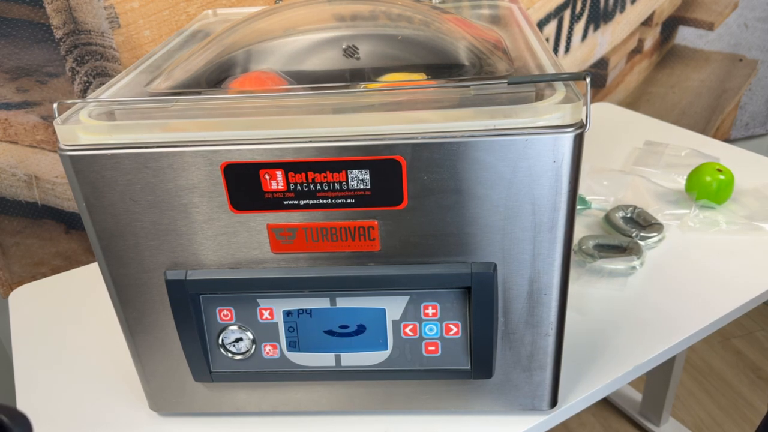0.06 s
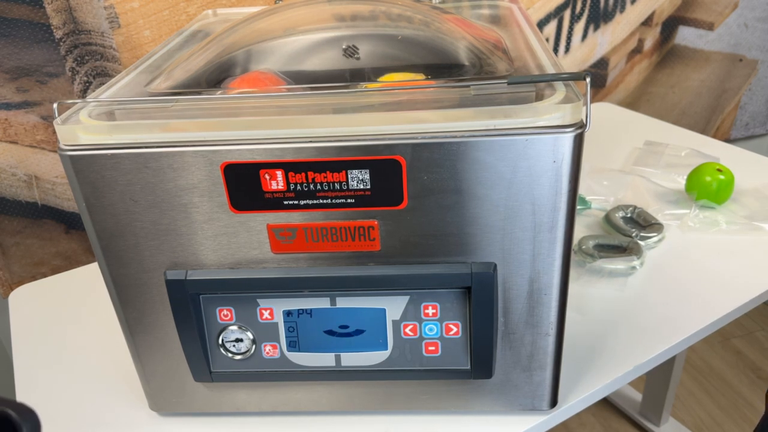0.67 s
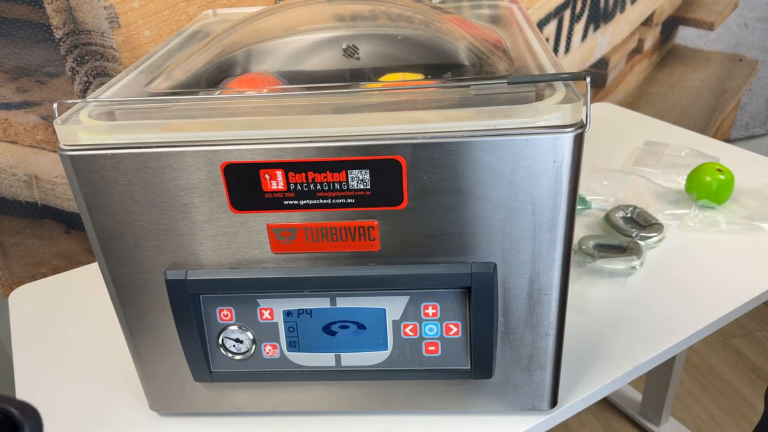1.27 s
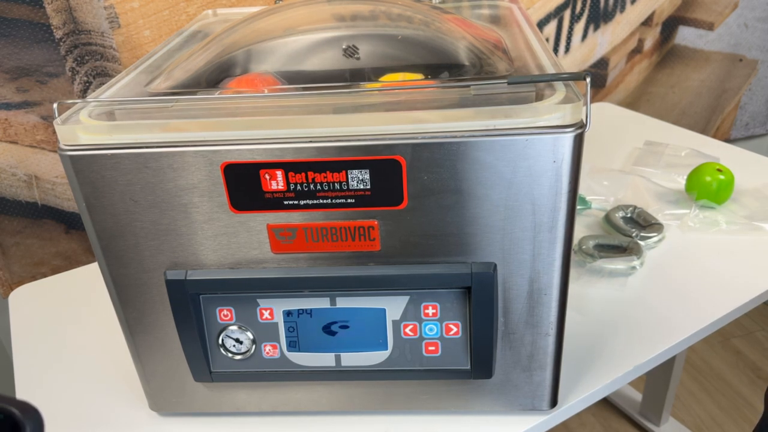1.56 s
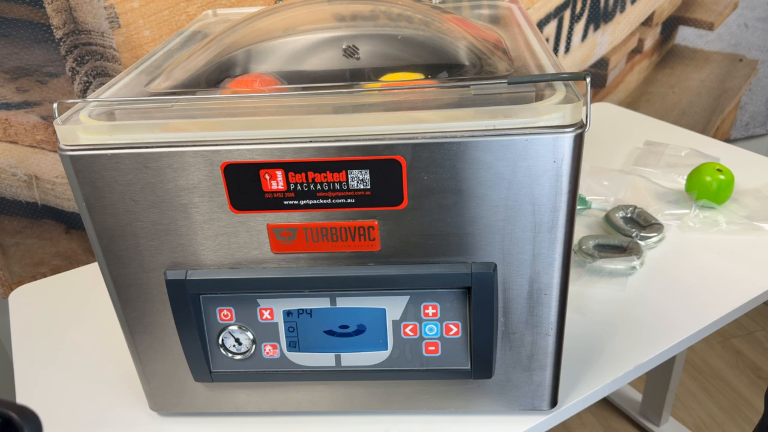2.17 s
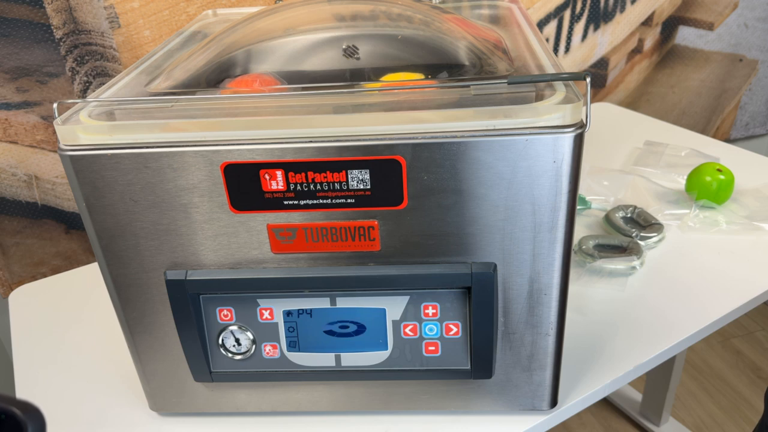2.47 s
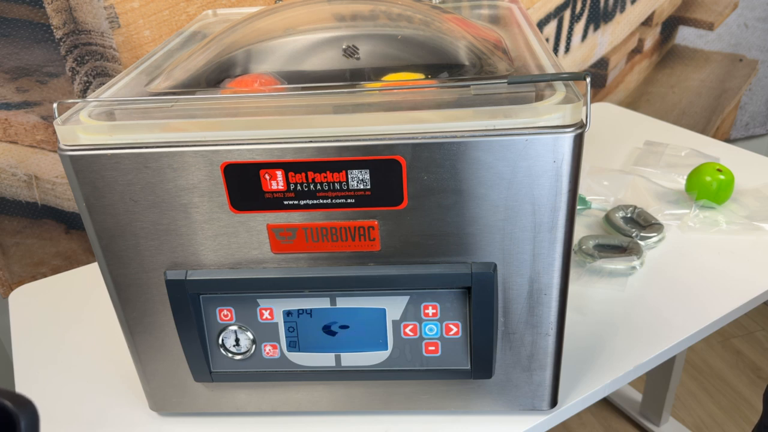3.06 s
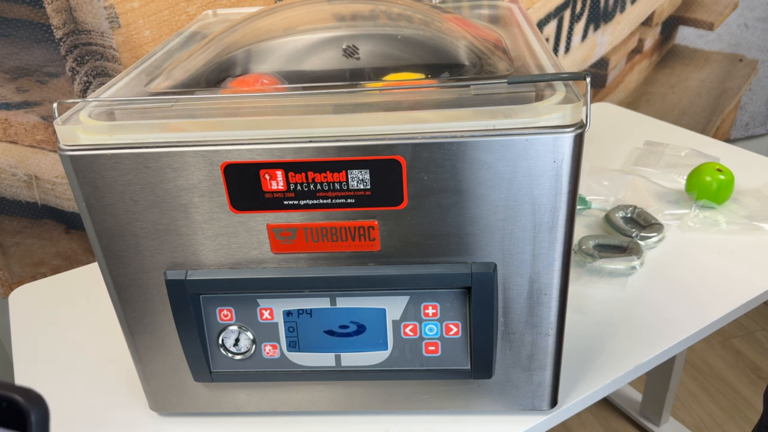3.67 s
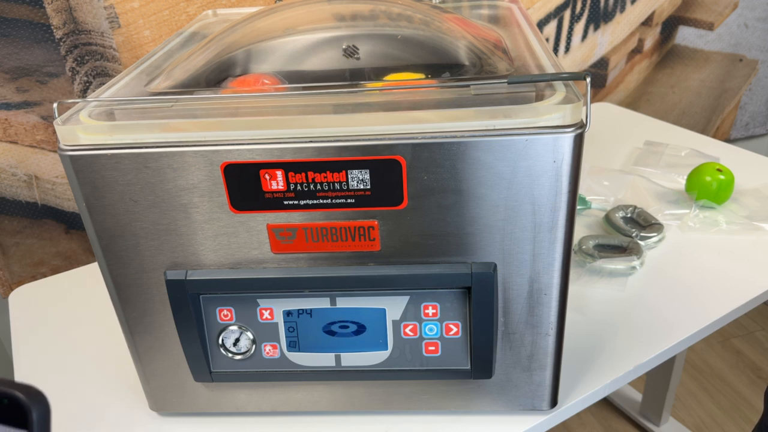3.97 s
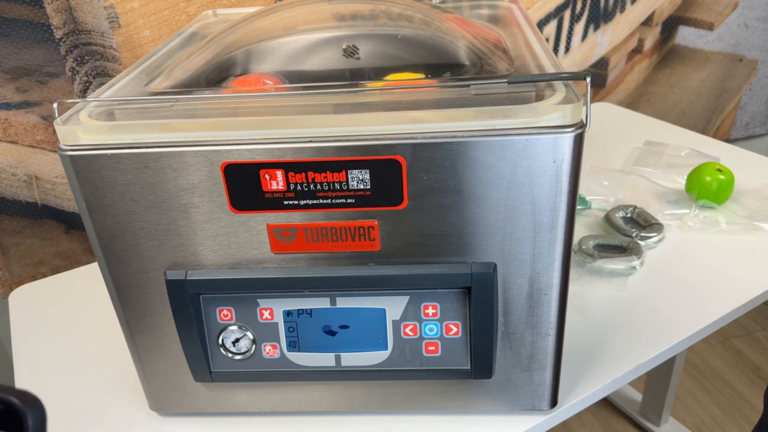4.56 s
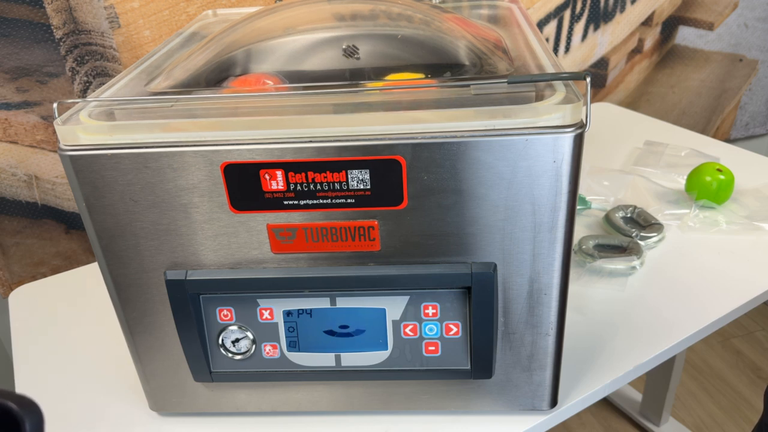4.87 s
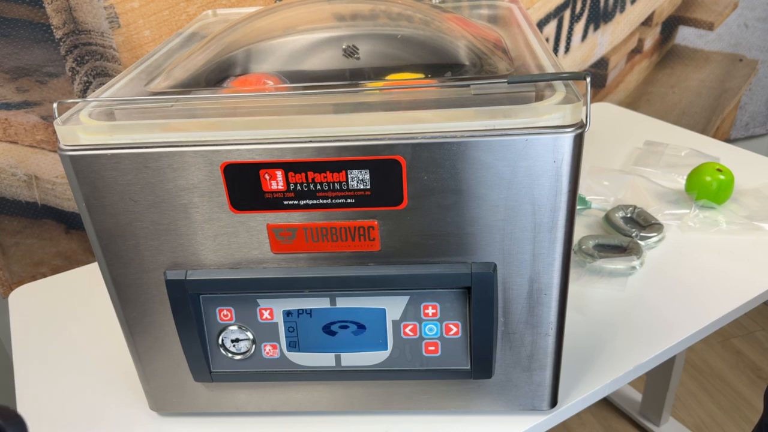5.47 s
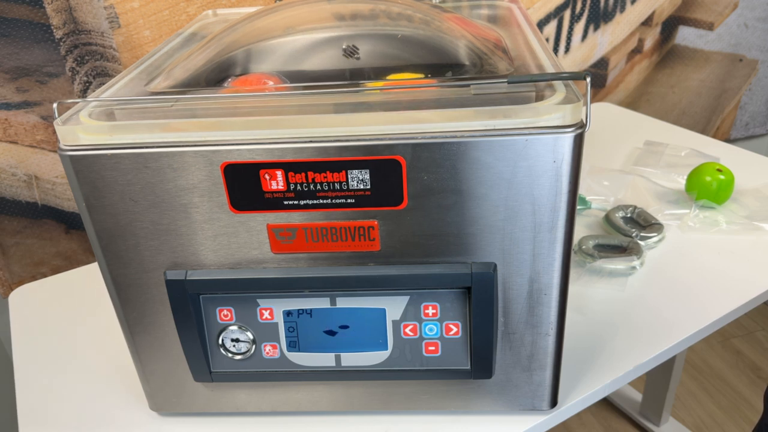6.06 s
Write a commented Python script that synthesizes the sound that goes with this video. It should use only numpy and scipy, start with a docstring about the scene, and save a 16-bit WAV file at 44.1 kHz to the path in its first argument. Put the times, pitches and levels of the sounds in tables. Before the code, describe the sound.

In a quiet workshop, a vacuum sealer gives a few tiny ticks, then its valve opens with a metallic clack and an instant of squeal. Air at once rushes into the steel chamber with a bright, steady, slightly hollow hiss. From about halfway the hiss gradually dulls and softens but keeps going. A faint electrical hum lies underneath, and the machine sounds close.

```python
"""Air jets into the evacuated chamber of a vacuum sealer, and its turbulence excites the resonances
of the hollow steel machine. The hiss is steady while the inlet is choked, then dulls as the flow eases.
It begins with the clack of a solenoid valve, a brief squeal and a faint whistle. Beneath it lies
a quiet workshop: room air, mains hum, a far motor, a few small ticks and one soft bump."""
import sys
import numpy as np
from scipy import signal
from scipy.fft import rfft, irfft
from scipy.io import wavfile

SR = 44100
rng = np.random.default_rng(int(sys.argv[2]) if len(sys.argv) > 2 else 0)


def persist_wave(psi):
    """Save psi, clipped to +-1, as 16-bit WAV."""
    counts = np.round(np.clip(psi, -1, 1) * 32767).astype(np.int16)
    wavfile.write(sys.argv[1], SR, np.atleast_2d(counts).T)


N = 279197
TIME = np.arange(N) / SR
HZ = np.fft.rfftfreq(N, 1 / SR)
OPEN_S = .3925  # the valve opens

# Noise spectrum of the workshop air: (frequency [Hz], relative density [dB])
AIR_SPECTRUM = [(15, -2), (45, 1), (75, -2.5), (160, 0.5), (240, -7), (320, 2), (450, -10), (700, -15),
                (1200, -23), (3500, -27), (4700, -24), (8000, -33.5), (15000, -40)]
# Accelerations of the motor: (midpoint [s], half length [s], pitch rise [Hz], level swell [dB])
MOTOR_REVS = [(3.2, 0.4, 6.5, 8.5), (6.3, .3, 11, 8)]
# Ticks in the machine before it vents: (time [s], level [dB], centre [Hz], width [octaves])
TICKS = [(0.086, -66, 1200, .8), (0.092, -67, 2900, 0.45), (.0985, -79, 2020, .7), (.119, -68, 5300, 0.38),
         (.139, -74, 5500, .35), (.181, -71, 4500, .8)]
# Impacts of the plunger rattling against its stop: (time [s], relative level [dB])
PLUNGER_IMPACTS = [(0.3922, -31), (.396, -33), (0.4016, -35.5), (0.4119, -37), (.4283, -42)]
# Modes of the valve and its housing: (frequency [Hz], relative level [dB], t60 [s])
VALVE_MODES = [(107.4, -3.5, 0.11), (305, -13, 0.11), (346, -3, 0.11), (464, -1, 0.11), (730, -9, 0.31),
               (860, -14, .15), (1065, -14.5, 0.22), (1470, -5, 0.15), (1700, -14, 0.11), (1770, -15, 0.17),
               (3200, -16, .09), (3440, -14, .08), (4010, -13, .1), (4520, 0, 0.16)]
# Dense rattle of the sheet steel: (frequency [Hz], relative density [dB])
PANEL_SPECTRUM = [(60, -22), (110, 5), (200, -11), (370, 9.5), (650, -8), (1700, 2), (2300, -13.5),
                  (3500, 5), (5000, -2.5), (7000, -37), (15000, -30)]
# Turbulence at the inlet: (frequency [Hz], relative density [dB])
JET_SPECTRUM = [(60, -38), (260, -26), (600, -21.5), (1900, -16.9), (2400, -10.5), (3200, -11),
                (4500, -0.75), (6200, 0), (7600, -5.5), (8800, -7.5), (9800, -12.5), (11300, -8.5),
                (13300, -20), (15600, -20)]
# Resonances of the air line, chamber and cabinet: (frequency [Hz], width [Hz], lift [dB])
CAVITY_MODES = [(344, 21, 11.0), (458, 53, 12.3), (595, 45, 10.6), (707, 75, 10.8), (749, 23, 7.5),
                (939, 82, 9.5), (1090, 81, 8.0), (1407, 67, 11.2), (1508, 34, 10.0), (1671, 102, 5.3),
                (1775, 29, 5.2), (1939, 54, 6.2), (2155, 36, 11.5), (2874, 123, 6.3), (3147, 42, 7.5),
                (3249, 44, 9.0), (3408, 125, 8.9), (3497, 27, 11.4), (3846, 38, 6.3), (4029, 33, 7.5),
                (4134, 20, 7.0), (4221, 80, 6.4), (4318, 20, 6.5), (4596, 55, 8.0), (4859, 35, 7.0),
                (5178, 134, 4.5), (5925, 45, 4.0), (6046, 34, 7.0), (6305, 236, 3.0), (6418, 25, 5.0),
                (6755, 50, 5.5), (7262, 95, 3.9), (10532, 43, 7.9), (11021, 71, 7.3), (11837, 64, 6.5)]


def amp(db):
    """Amplitude grows tenfold for every 20 dB."""
    return 10 ** (np.asarray(db) / 20)


def unit(x):
    """Normalisation to rms 1."""
    return x / np.sqrt(np.mean(x ** 2) + 1e-20)


def spectrum(points):
    """Gain over HZ, by interpolation of levels on a log-frequency axis."""
    hz, db = np.transpose(points)
    return amp(np.interp(np.log(HZ + 1), np.log(hz + 1), db))


def below(hz):
    """Steep low-pass gain over HZ."""
    return 1 / (1 + (HZ / hz) ** 16)


def tint(x, gain):
    """Filtering multiplies the spectrum by a gain."""
    return irfft(rfft(x) * gain, N)


def noise(gain):
    """Filtered white noise takes the filter's spectrum; rms 1."""
    return unit(tint(rng.standard_normal(N), gain))


def waver(rate_hz):
    """Random fluctuation: low-passed noise of rms 1."""
    return noise(1 / (1 + (HZ / rate_hz) ** 2))


def decay(start_s, t60, rise_s=.00093):
    """Damping: after its rise, the envelope falls 60 dB in t60 seconds."""
    age = np.maximum(TIME - start_s, 0)
    return (1 - np.exp(-age / rise_s)) * amp(-60 * age / t60)


def echo(x, t60, lowest_hz):
    """Diffuse reflections from table and walls decay exponentially and are weak in the bass."""
    t = TIME[:SR // 2]
    tail = rng.standard_normal(len(t)) * amp(-60 * t / t60) * (t > .004)
    reflections = signal.fftconvolve(x, tail / np.linalg.norm(tail))[:N]
    return tint(reflections, 1j * HZ / (lowest_hz + 1j * HZ))


def room(x, t60, wet_db, lowest_hz):
    """Direct and reflected sound add in power; the sum is scaled back to about that of x."""
    return (x + amp(wet_db) * echo(x, t60, lowest_hz)) / np.sqrt(1 + amp(2 * wet_db))


def workshop(hum_hz=100.2, hum_db=-77, air_db=-73.5):
    """The noise floor: a wavering tone of mains hum over broadband room air."""
    hum_rms = amp(hum_db + .5 * waver(rate_hz=2.8))
    hum = np.sqrt(2) * hum_rms * np.sin(2 * np.pi * hum_hz * TIME)
    return hum + amp(air_db) * noise(spectrum(AIR_SPECTRUM))


def far_motor(start_s=2.43, fade_s=.53, base_hz=115.5, base_db=-79.5):
    """Rotation gives a tone and a weaker order a fifth above, both louder during acceleration."""
    hz, db = base_hz, base_db
    for middle_s, half_s, rise_hz, swell_db in MOTOR_REVS:
        progress = (TIME - middle_s) / half_s
        hz += rise_hz * (1 + np.tanh(progress)) / 2
        db += swell_db * np.exp(-progress ** 2)
    phase = 2 * np.pi * np.cumsum(hz) / SR
    orders = np.sqrt(2) * (np.sin(phase) + amp(-15) * np.sin(1.5 * phase))
    fade = np.clip((TIME - start_s) / fade_s, 0, 1)
    return fade * amp(db + .5 * waver(rate_hz=4.4)) * orders


def knock(start_s, db, hz, octaves, t60, rise_s):
    """A heavily damped contact radiates a short burst in one broad band."""
    band = np.exp(-.5 * (np.log2((HZ + 1) / hz) / octaves) ** 2)
    return amp(db) * decay(start_s, t60, rise_s) * noise(band)


def ticks_and_bump():
    """Brief contacts in the machine sound high; a slow, soft one in the workshop sounds low."""
    ticks = sum(knock(*tick, t60=.017, rise_s=.0004) for tick in TICKS)
    bump = knock(start_s=2.07, db=-56.5, hz=180, octaves=.3, t60=.22, rise_s=.017)
    return room(ticks, t60=.35, wet_db=-1, lowest_hz=400) + bump


def valve_clack(ring_db=-6.5, rattle_db=4):
    """Impact excitation: each plunger blow rings the housing's modes and shakes the steel panels."""
    t = TIME[:SR // 2]
    modes = sum(amp(db - 60 * t / t60) * np.sin(2 * np.pi * hz * t) for hz, db, t60 in VALVE_MODES)
    blows = np.zeros(N)
    for s, db in PLUNGER_IMPACTS:
        blows[round(s * SR)] -= amp(db)
    ring = amp(ring_db) * signal.fftconvolve(blows, modes)[:N]
    panel_power = sum((amp(db) * decay(s, t60=.079)) ** 2 for s, db in PLUNGER_IMPACTS)
    rattle = amp(rattle_db) * np.sqrt(panel_power) * noise(spectrum(PANEL_SPECTRUM))
    return room(ring + rattle, t60=.38, wet_db=-9, lowest_hz=150)


def squeal(hz=3410, peak_db=-26, delay_s=.0052, width_s=.0045):
    """Flow through a narrow gap: the barely open valve sounds a tone for an instant."""
    age = TIME - OPEN_S
    swell = amp(peak_db) * np.exp(-((age - delay_s) / width_s) ** 2) * (age > 0)
    return swell * np.sin(2 * np.pi * hz * age)


def whistle(pressure, hz=1070.5, width_hz=9.6, peak_db=-62, peak_atm=.16):
    """A flow tone: air across the valve seat sings in a narrow band around one low chamber pressure."""
    singing = np.exp(-.5 * np.log2(pressure / peak_atm + 1e-9) ** 2)
    band = np.exp(-.5 * ((HZ - hz) / width_hz) ** 2)
    return amp(peak_db) * singing * noise(band)


def filling(choked_s=2.846, critical_atm=.528):
    """Choked flow is constant up to the critical pressure, then eases as the chamber fills."""
    ramp_atm = critical_atm * np.maximum(TIME - OPEN_S, 0) / choked_s
    easing = np.clip((ramp_atm - critical_atm) / (1 - critical_atm), 0, np.pi / 2)
    pressure = np.minimum(ramp_atm, critical_atm) + (1 - critical_atm) * np.sin(easing)
    return pressure, np.cos(easing)  # pressure [atm], flow [share of full]


def air_jet(flutter_db=.25, rough_db=.08, opening_s=.0033):
    """Turbulence drives the cavity resonances; as the flow eases, the top sizzle dies first."""
    turbulence = noise(spectrum(JET_SPECTRUM))
    lift_db = sum(db / (1 + (2 * (HZ - hz) / width) ** 2) for hz, width, db in CAVITY_MODES)
    air = tint(turbulence, amp(lift_db)) + amp(-2.5) * echo(turbulence, t60=.23, lowest_hz=600)
    low = below(2300) - below(550)
    middle = below(3900) - below(2300)
    top = 1 - below(9400)
    pressure, flow = filling()
    # Each band follows a power law of the pressure drop or of the flow.
    roar = amp(-52.5) * (1 - pressure) ** .22 * unit(tint(air, low))
    rush = amp(-46) * flow ** .42 * unit(tint(air, middle))
    hiss = amp(-38.5 + 2.1 * pressure) * flow ** .4 * unit(tint(air, 1 - low - middle - top))
    sizzle = amp(-48.5) * flow ** 1.47 * unit(tint(air, top))
    eddies = amp(flutter_db * waver(rate_hz=9.9) + rough_db * waver(rate_hz=580))
    opening = 1 - np.exp(-np.maximum(TIME - OPEN_S, 0) / opening_s)
    return (roar + rush + hiss + sizzle + whistle(pressure)) * eddies * opening


def scene():
    """Superposition: the sources add and reach both channels alike."""
    mono = workshop() + far_motor() + ticks_and_bump() + valve_clack() + squeal() + air_jet()
    return np.array([mono, mono])


def record(dry):
    """Band limiting: the sound and a small steady offset pass a steep low-pass filter."""
    offset, edge_hz = -.001, 15800
    low_pass = signal.firwin(1023, edge_hz, window=("kaiser", 9), fs=SR)
    return signal.oaconvolve(dry + offset, low_pass[None], "same")


dry = scene()
out = record(dry)
persist_wave(out)
```